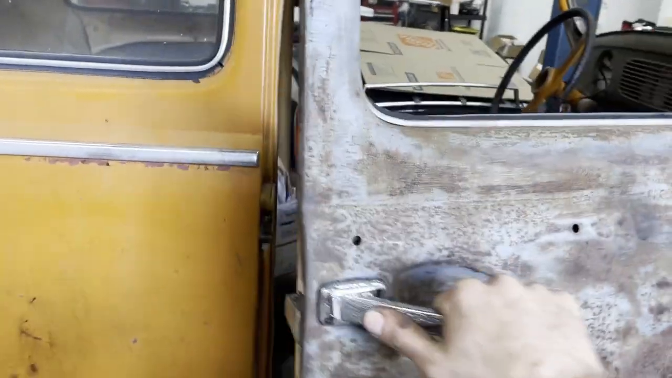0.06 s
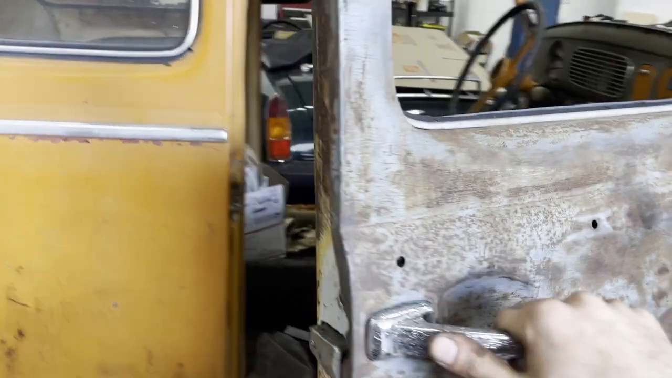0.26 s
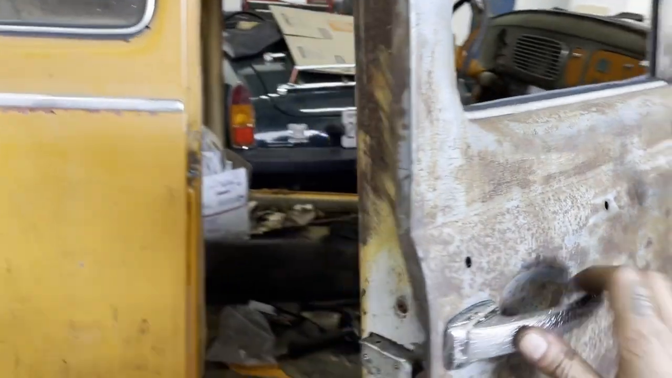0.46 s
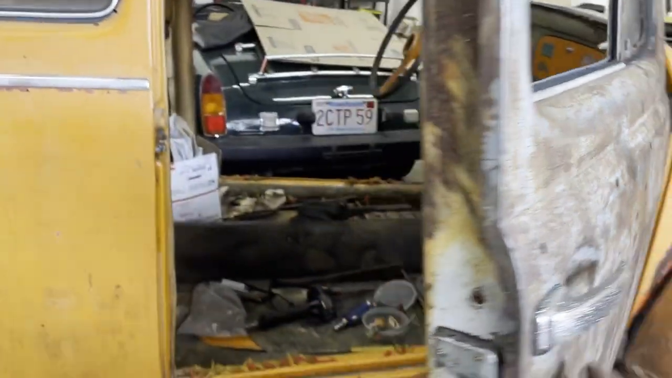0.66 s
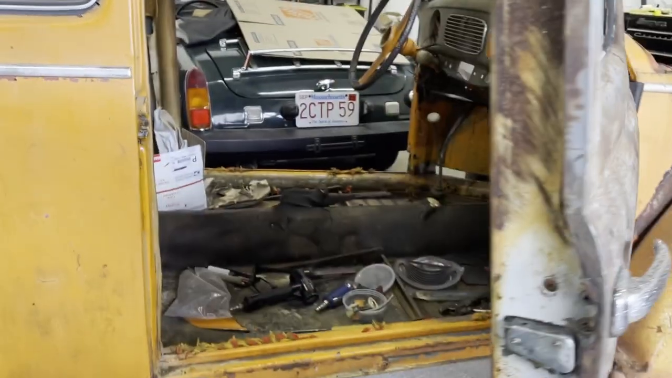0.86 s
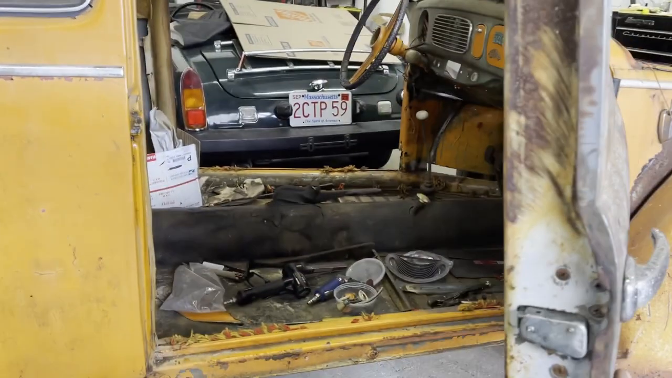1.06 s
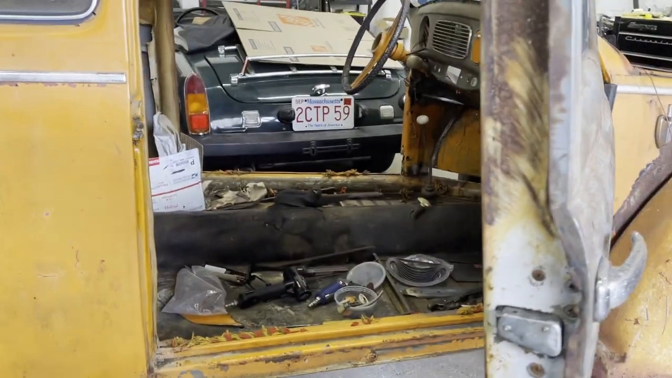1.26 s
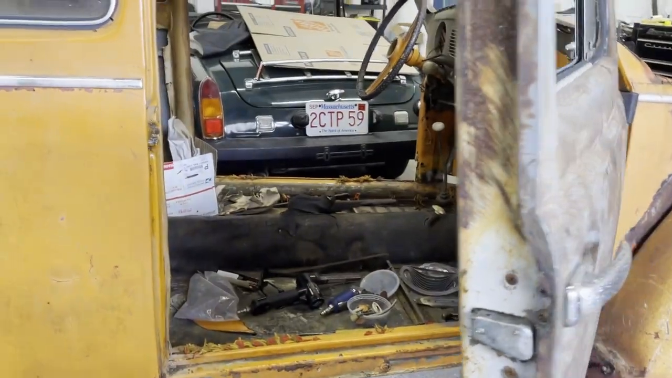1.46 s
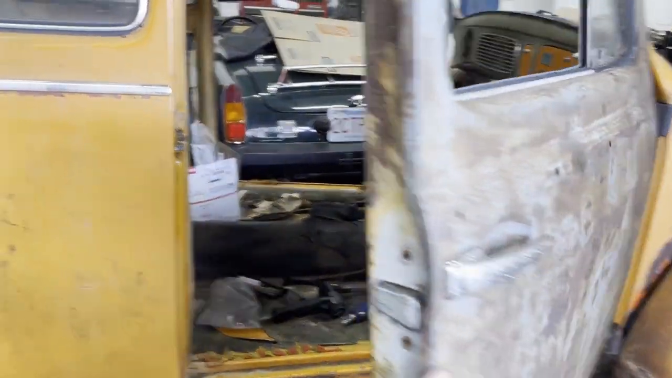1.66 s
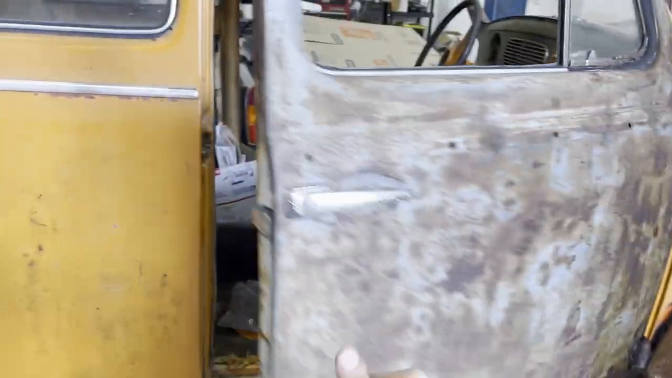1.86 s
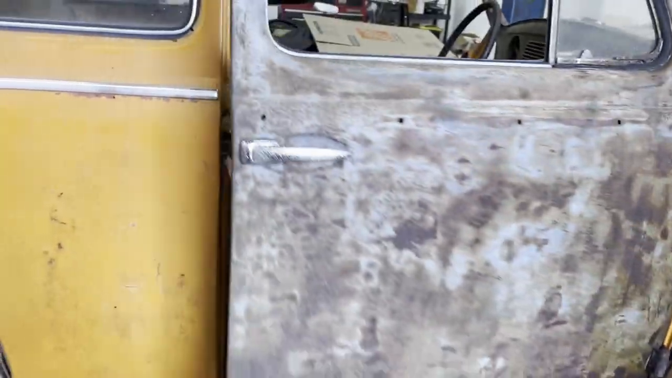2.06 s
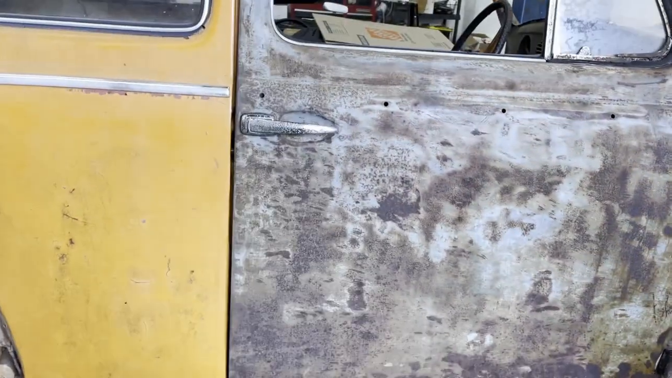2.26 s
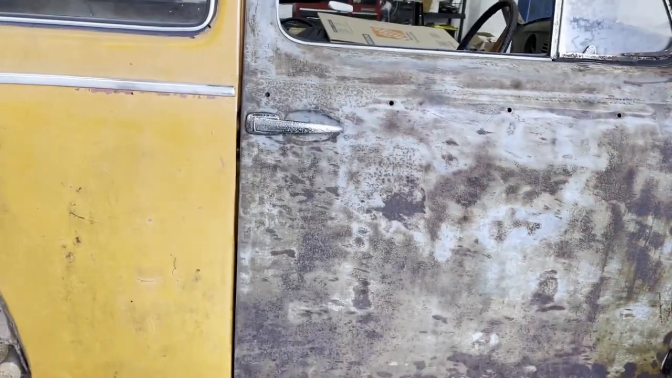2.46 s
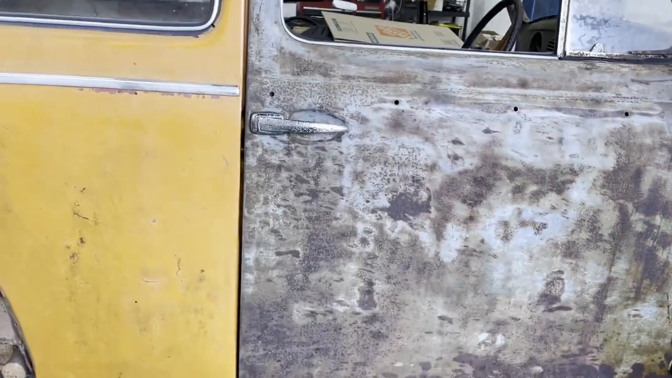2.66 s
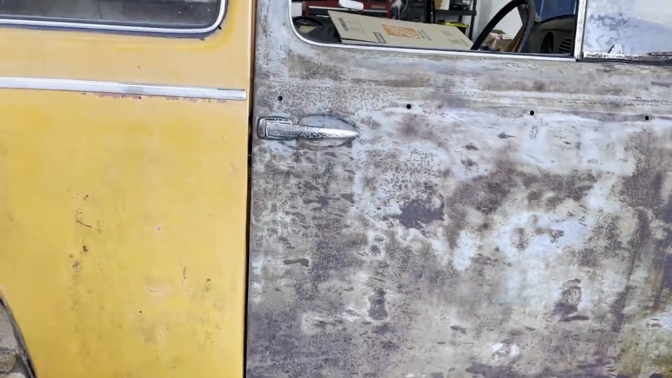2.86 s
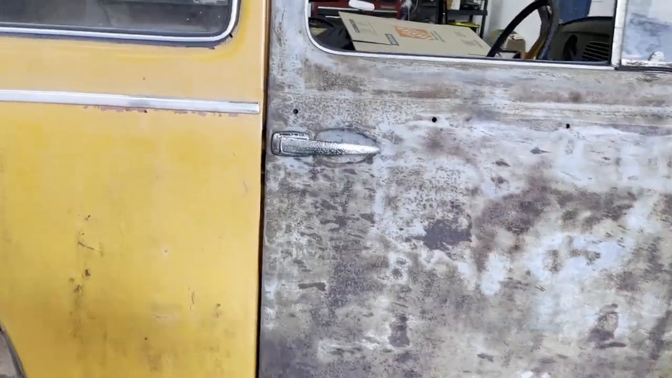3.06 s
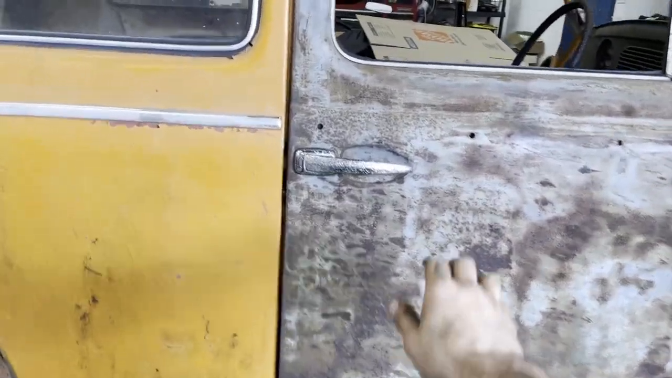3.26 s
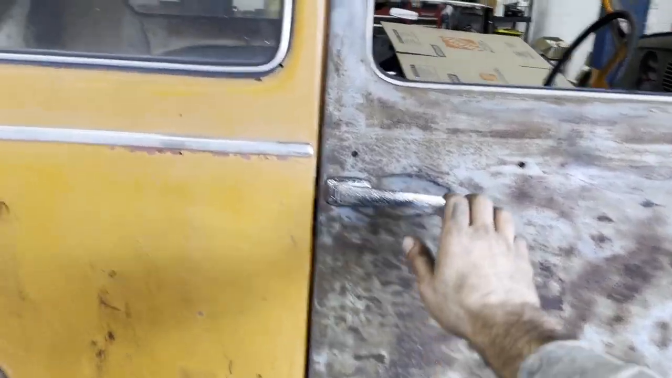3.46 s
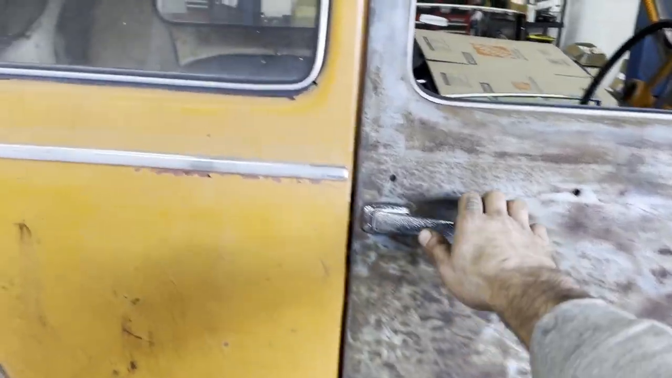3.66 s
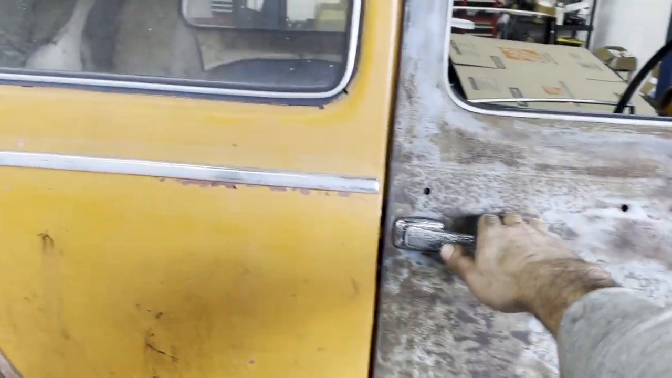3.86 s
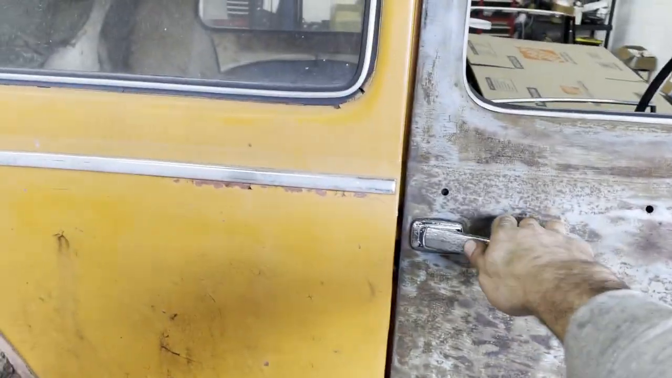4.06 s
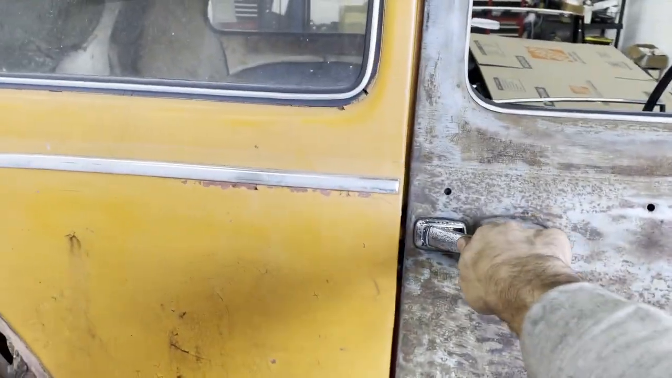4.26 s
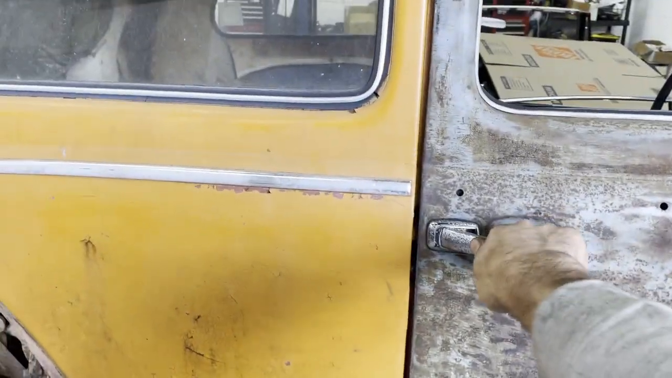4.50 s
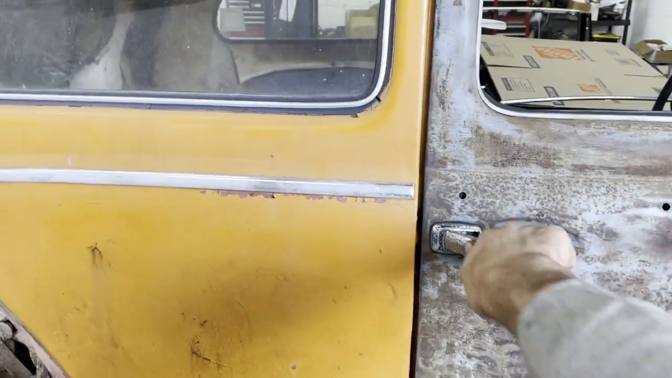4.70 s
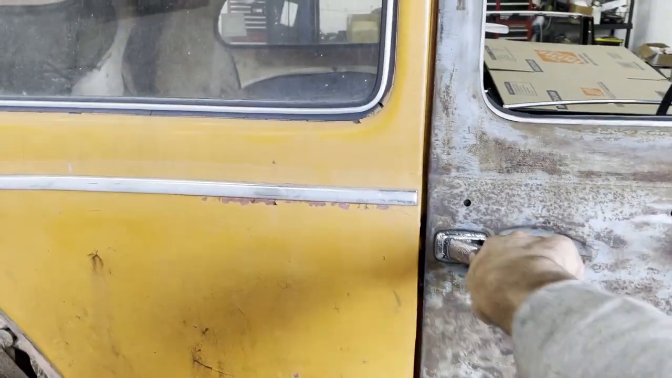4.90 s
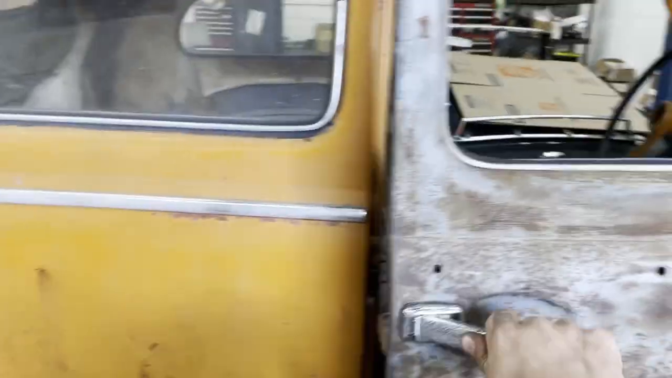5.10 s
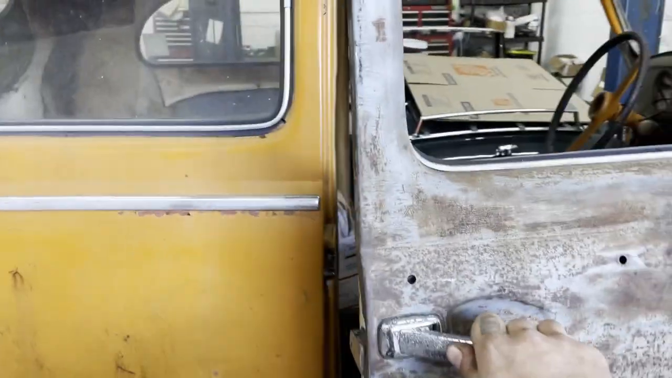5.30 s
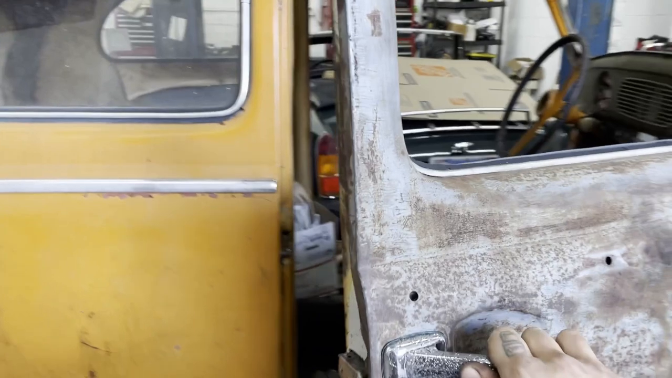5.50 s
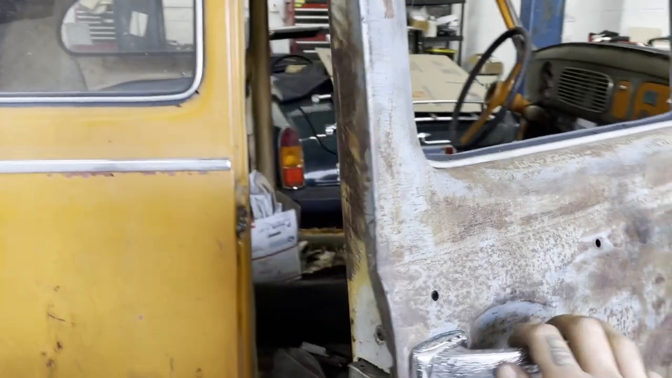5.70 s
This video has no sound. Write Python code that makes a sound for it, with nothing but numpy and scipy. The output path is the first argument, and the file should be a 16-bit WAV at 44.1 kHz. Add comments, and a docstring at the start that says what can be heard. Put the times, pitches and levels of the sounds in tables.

```python
"""In a garage, an old steel car door is heard from arm's length. It swings open on a juddering, dry hinge and is
slammed: latch, frame and panel collide in turn and the loose fittings rattle. A hand then works the push-button
handle, the latch lets go with a clack and the door is tugged free of its frame. Jerks, grains and strikes drive
the resonances of the steel; echoes made of fading noise place them in the room."""
import sys
import numpy as np
from scipy import signal
from scipy.fft import rfft, irfft, next_fast_len
from scipy.io import wavfile
from scipy.ndimage import uniform_filter1d

SR = 44100
rng = np.random.default_rng(int(sys.argv[2]) if len(sys.argv) > 2 else 0)


def unload_audio(sound):
    """Save the sound as a 16-bit wav file, at the path given as the first command line argument."""
    columns = np.transpose(np.atleast_2d(sound))
    # keep every value between -1 and 1, then stretch to whole-number steps
    steps = np.round(np.clip(columns, -1, 1) * 32767)
    wavfile.write(sys.argv[1], SR, steps.astype(np.int16))


N = 253134
T = np.arange(N) / SR  # the time of every sample (s)

# tone of dry grit: f/Hz, level/dB
GRIT_TONE = [(200, -11), (700, 14), (2500, 9), (5000, -1), (7000, -4), (11000, -31), (15000, -28.5)]
# tone of a scuff on the steel: f/Hz, level/dB
SCUFF_TONE = [(300, -18.5), (900, -0.5), (1370, 10), (1650, -11.5), (2000, 1), (2500, -4), (3300, -14.5),
              (6000, -32), (12000, -35)]
# sound from all sides, its left-right difference against its middle: f/Hz, level/dB
SIDE_WIDTH = [(80, -16), (250, -12), (500, -9), (1200, -7), (2000, -1), (6000, -1), (8200, -9), (11000, -7)]


def undb(db):
    """Decibels to gain."""
    return 10 ** (np.asarray(db) / 20)


def unit(x):
    """Scale to rms 1."""
    return x / np.sqrt(np.mean(x ** 2))


def over_hz(points, size):
    """Points joined on a log-frequency axis, read at the bins of a transform."""
    hz, value = np.transpose(points)
    return np.interp(np.log(np.fft.rfftfreq(size, 1 / SR) + 1), np.log(hz), value)


def colour(x, points):
    """Filter to the given (Hz, dB) response without sounding ahead of its input (minimum phase)."""
    size = next_fast_len(x.shape[-1] + 4096, True)
    cepstrum = irfft(np.log(undb(over_hz(points, size))), size)
    # folding the cepstrum onto its first half makes the filter causal
    cepstrum[1:size // 2] *= 2
    cepstrum[size // 2 + 1:] = 0
    return irfft(rfft(x, size) * np.exp(rfft(cepstrum)), size)[..., :x.shape[-1]]


def resonate(x, hz, width_hz):
    """One resonance, gain 1 at its centre."""
    return signal.lfilter(*signal.iirpeak(hz, hz / width_hz, SR), x)


def fade(t, t60):
    """Exponential decay by 60 dB in t60."""
    return np.exp(-np.log(1000) * t / t60)


def ring(modes, t, contact_ms, blur, cycles=0.51):
    """Modes of alternating sign swell during the contact and their first cycles; loose joints blur their pitch."""
    out = 0
    for k, (hz, db, t60) in enumerate(modes):
        drift = blur * np.cumsum(rng.standard_normal(len(t))) * np.sqrt(hz / SR)
        phase = 2 * np.pi * hz * t + drift
        swell = 1 - np.exp(-t / (contact_ms / 1000 + cycles / hz))
        out = out + (-1) ** k * undb(db) * np.sin(phase) * fade(t, t60) * swell
    return out


def add(track, s, sound):
    """Mix a sound in at time s."""
    start = max(int(s * SR), 0)
    track[start:start + len(sound)] += sound[:N - start]


def grains(size, rate, spread_db):
    """Random tiny contacts of unequal force."""
    hits = rng.random(size) < rate / SR
    force = undb(spread_db * rng.standard_normal(size))
    return unit(hits * rng.choice([-1, 1], size) * force)


def slips(rate, uneven, spread_db):
    """Stick-slip: a train of jerks, uneven in gap and size."""
    gap, force = rng.standard_normal((2000, 2)).T
    elapsed = np.cumsum(np.exp(uneven * gap)) - np.exp(uneven * gap[0])
    at = (elapsed * SR / rate).astype(int)
    return np.bincount(at[at < N], undb(spread_db * force)[at < N], N)


def smear(x, t60):
    """Bending waves spread each jerk out in time on their way through the panel."""
    t = T[:SR // 8]
    return signal.fftconvolve(x, rng.standard_normal(len(t)) * fade(t, t60))[:N]


def stroke(start, end, db, swell_db_per_s, attack_s, release_t60):
    """Gain of one movement: it sets in, swells or sags while it lasts, then dies away."""
    held = np.clip(T - start, 0, max(end - start, 0))
    release = fade(np.maximum(T - end, 0), release_t60)
    return undb(db + swell_db_per_s * held) * np.minimum(held / attack_s, 1) * release


def follow(x, moves, attack_s, release_t60, size=3000):
    """Let a sound take the level of a series of movements, dying away after each."""
    power = uniform_filter1d(uniform_filter1d(x ** 2, size), size)
    steady = x / np.sqrt(power + 1e-3 * np.mean(x ** 2))
    return steady * sum(stroke(*move, attack_s, release_t60) for move in moves)


def shower(times, db, hz, octaves, cycles):
    """Many small impacts, each with its own pitch and force, ringing for a few cycles."""
    out, spread_db = np.zeros(N), 2
    chance = rng.standard_normal((len(times), 2)).clip(-2, 2)
    for s, level_db, (pitch, force) in zip(times, db, chance):
        own_hz = min(hz * 2 ** (octaves * pitch), SR / 3)
        turns = own_hz * T[:int(SR * cycles / own_hz)]
        chink = np.sin(2 * np.pi * turns) * fade(turns, cycles) * (1 - np.exp(-turns)) ** 2
        add(out, s, undb(level_db + spread_db * force) * chink)
    return out


def clanks(modes, taps, blur):
    """A steel part rings with the same modes each time it is struck."""
    out = np.zeros(N)
    longest_s = max(t60 for _, _, t60 in modes)
    t = T[:SR * 2 // 3][:int(SR * longest_s)]
    for s, db, contact_ms in taps:
        add(out, s, undb(db) * ring(modes, t, contact_ms, blur))
    return out


def diffuse(size):
    """Noise from all sides: alike at both microphones in the bass, unlike higher up."""
    mid, side = rng.standard_normal((2, size))
    return mid + np.array([[1], [-1]]) * colour(side, SIDE_WIDTH)


def background(db=-56.5):
    """A faint, steady background from all sides, with a low rumble in the deep bass."""
    # tone of the background: f/Hz, level/dB
    background_tone = [(15, -41), (30, -8.5), (65, 0.5), (264, -10), (430, -4.5), (1900, -19), (4500, -28.5),
                       (14000, -43.5)]
    return undb(db) * unit(colour(diffuse(N), background_tone))


def judder(count=900):
    """The stiff hinges move in jerks, no two alike: deep ones shake the whole door, lighter ones scrape."""
    # swings on the hinges: start t/s, end t/s, first level/dB, swell/(dB per s), scrape against that level/dB
    swings = [(0, 0.276, -26.5, -25.5, -8), (0.283, 0.804, -25, -5.5, -11.5),
              (5.595, 5.723, -28.5, 35, -19.5)]
    attack_s, release_t60 = 0.014, 0.14
    start = np.zeros(count)  # all jerks share one middle level (dB)
    rumble = unit(shower(rng.uniform(0, T[-1], count), start, hz=120, octaves=.65, cycles=5.6))
    scrape = unit(shower(rng.uniform(0, T[-1], count), start, hz=449, octaves=.3, cycles=10))
    out = 0
    for *move, scrape_db in swings:
        out = out + follow(rumble + undb(scrape_db) * scrape, [move], attack_s, release_t60)
    return out


def rubbing(rate=2800, spread_db=4):
    """Hinge, check strap and hand rub dryly: short strokes of grit, some stirring a resonance, with some hiss."""
    # strokes: middle t/s, spread t/s (standard deviation), level/dB, then against it: resonance/dB, hiss/dB
    rubs = [(0.028, 0.083, -38, -10.5, -21), (0.434, 0.24, -57, -8.5, -20), (0.519, 0.017, -39, -31, -13),
            (0.557, 0.0049, -34.5, -32, -11.5), (0.582, 0.027, -50, 9.5, -23),
            (0.804, 0.038, -55, -21, -4.5), (1.091, 0.13, -55.5, -7, -7.5), (1.834, 0.025, -42.5, -17, -5),
            (3.104, 0.23, -57.5, -4, -17.5), (5.72, 0.087, -63.5, -12.5, -24)]
    hiss_hz, hiss_width_hz = 10260, 18000
    out, grit = np.zeros(N), unit(colour(grains(N, rate, spread_db), GRIT_TONE))
    ringing = unit(resonate(grit, 1005, width_hz=160))
    hiss = resonate(grains(N, rate, spread_db), hiss_hz, hiss_width_hz)
    hiss = unit(resonate(hiss, hiss_hz, hiss_width_hz))
    for s, spread_s, db, resonance_db, hiss_db in rubs:
        rub = grit + undb(resonance_db) * ringing + undb(hiss_db) * hiss
        out += undb(db) * rub * np.exp(-.5 * ((T - s) / spread_s) ** 2)
    return out


def knocks(t60=0.068, overtone=1.9, overtone_db=-8, overtone_t60=0.022, tick_t60=0.063, tick_rise_s=0.0023):
    """Larger slips and bumps of hinge and panel: a damped hollow note, its brief overtone and a scuffing tick."""
    # knocks: t/s, level/dB, f/Hz, tick against that level/dB
    bumps = [(.293, -10.5, 213, -44), (.311, -11, 95, -45), (0.372, -13, 114, -42), (0.401, -11, 185, -49),
             (0.446, -10, 113, -43), (0.504, -11.5, 200, -37), (.562, -14, 287, -24),
             (0.586, -9.5, 177.5, -36), (0.724, -27, 151, -40), (.752, -28, 650, -27),
             (0.767, -14.5, 135, -40), (0.827, -18.5, 171, -42), (.957, -29, 608, -28.5),
             (1.321, -39, 548, -20), (2.575, -15.5, 323, -22), (3.194, -31, 634, -5.5),
             (3.249, -31.5, 624, -12), (3.314, -24.5, 630, -19), (3.409, -26.5, 491, -16),
             (3.567, -33.5, 553, -16), (3.631, -29, 607, -8.5), (3.661, -27, 540, -9.5),
             (3.879, -34, 543, -26), (4.967, -5.5, 232.5, -20), (5.048, -13.5, 480, -20),
             (5.136, -17.5, 550, -16), (5.203, -22.5, 567, -34), (5.563, -16.5, 100, -47.5),
             (5.601, -34, 561, -25), (5.67, -18, 135, -39), (5.708, -20.5, 114.6, -38)]
    out, t = np.zeros(N), T[:SR // 4]
    for s, db, hz, tick_db in bumps:
        modes = [(hz, 0, t60), (overtone * hz, overtone_db, overtone_t60)]
        note = ring(modes, t, contact_ms=0.8, blur=0.45)
        scuff = unit(colour(rng.standard_normal(len(t)), SCUFF_TONE))
        tick = scuff * fade(t, tick_t60) * (1 - np.exp(-t / tick_rise_s))
        add(out, s, undb(db) * (note + undb(tick_db) * tick))
    return out


def squeaks():
    """Hinge pin and latch sing for instants, mostly falling in pitch; the more it wavers, the rougher they sound."""
    # squeaks: middle t/s, spread t/s (standard deviation), level/dB, start f/Hz, end f/Hz, waver f/Hz (rms)
    songs = [(0.496, 0.0086, -30, 2560, 2460, 45), (0.54, .022, -37, 2360, 2335, 170),
             (0.598, .025, -53, 3610, 3570, 45), (0.68, 0.036, -58, 4660, 4665, 35),
             (1.856, 0.021, -38.5, 1180, 1138, 175), (2.336, 0.0019, -22, 6310, 6185, 115),
             (4.635, 0.0034, -25, 6490, 5520, 250), (5.137, 0.001, -22.5, 4430, 3630, 115)]
    out, wobble = 0, unit(uniform_filter1d(rng.standard_normal(N), size=40))
    for s, spread_s, db, start_hz, end_hz, waver_hz in songs:
        glide = np.interp(T, [s - 2 * spread_s, s + 2 * spread_s], [start_hz, end_hz])
        tone = np.sin(2 * np.pi * np.cumsum(glide + waver_hz * wobble) / SR)
        out = out + undb(db) * tone * np.exp(-.5 * ((T - s) / spread_s) ** 2)
    return out


def blow(db, boom_db, body_db, click_db, contact_ms, rattle_t60):
    """Each blow rings the panel and sets loose steel chattering; where it lands decides boom, body and click."""
    # main modes of the door: f/Hz, level/dB, t60/s
    door_modes = [(73, -6, 0.53), (89.7, -4.5, 0.85), (123, -12, 0.28), (142.6, -4, 0.63),
                  (167.3, 4.5, 0.42), (199.3, -8, 0.28), (271.2, -10.5, 0.34), (298, 3.5, 0.34),
                  (343.5, -12.5, 0.37), (381, -20.5, 0.58), (630, -15, 0.43), (725, -2, 0.1),
                  (857, -12, 0.19), (999, -5.5, 0.16)]
    # the crowd of weaker modes in the sheet steel: f/Hz, level/dB
    steel_tone = [(22, -1), (50, 25), (100, 23.5), (260, 22), (480, 14.5), (800, 11.5), (1450, 11.5),
                  (1750, 6), (2600, 10.5), (4200, 6), (6400, 4.5), (10500, 3), (14500, -6.5)]
    t = T[:SR * 3 // 4]
    chatter = grains(len(t), rate=4000, spread_db=4)
    chatter = chatter * (1 - np.exp(-1000 * t / contact_ms)) * fade(t, rattle_t60)
    panel = colour(chatter, steel_tone) + undb(-1) * ring(door_modes, t, contact_ms, blur=0.54)
    # boom, body, clang and click (Hz, dB)
    balance = [(84, boom_db), (224.1, body_db), (1296, 0), (10300, click_db)]
    return undb(db) * colour(panel, balance)


def door():
    """Hard, thin strikes of the latch and softer, heavy thuds against the frame."""
    # latch steel strikes steel: t/s, level/dB, click against it/dB, contact time/ms, rattle t60/s
    strikes = [(2.2, -43.5, -19.5, 2.6, 1), (2.278, -14.5, -2, 2.3, 0.076),
               (2.2921, -15.5, 13.5, 0.54, 0.017), (4.109, -41, -15, 1, 0.11),
               (4.615, -28, -22.5, 0.21, 0.028), (4.714, -33.5, 5, 1.5, 0.067), (4.945, -33, 3, 7, 0.18),
               (4.955, -21, -8.5, 2.7, 0.15), (5.135, -25.5, -13.5, 0.28, 0.081)]
    # the door's weight meets its frame or rebounds: t/s, level/dB, then against it: boom/dB, body/dB, click/dB;
    # rattle t60/s
    thuds = [(2.297, -18.5, 5.5, -5, -4, 0.46), (2.322, -25.5, 15, 7.5, -7, 0.18),
             (2.349, -24.5, 3, 4, -9, 0.34), (2.405, -31, 2.5, 9.5, -15, 0.8),
             (4.064, -53, 1, 9.5, -41.5, 1), (4.153, -43.5, 4, 4.5, -38.5, 0.71),
             (4.626, -23, -7, 7, -15, 0.2), (4.963, -19, 12, 0, -26, 0.23),
             (5.008, -33, 12, 8.5, -20, 0.36), (5.142, -46, -16.5, -5.5, -30, 0.2)]
    out = np.zeros(N)
    for s, db, click_db, contact_ms, t60 in strikes:
        add(out, s, blow(db, -8, -7.5, click_db, contact_ms, t60))
    for s, db, boom_db, body_db, click_db, t60 in thuds:
        add(out, s, blow(db, boom_db, body_db, click_db, 1.4, t60))
    return out


def pawl():
    """The latch pawl, a small steel catch, gives short dull clanks when struck."""
    # modes: f/Hz, level/dB, t60/s
    modes = [(1150, -2, 0.012), (1244, -7.5, .03), (1391, 4.5, 0.028), (1556, 0.5, .025),
             (1808, -14, 0.017), (2307, -20.5, 0.09)]
    # strikes: t/s, level/dB, contact time/ms
    taps = [(2.204, -32.5, 1.9), (4.616, -16.5, 1.5), (4.624, -8.5, 0.42), (4.635, -10.5, 0.96),
            (4.715, -23, .89), (4.9573, -17, 0.65), (4.9634, -18, 0.8), (4.967, -24.5, 0.88)]
    return clanks(modes, taps, blur=0.46)


def rattles(count=90):
    """Latch parts and loose rods clatter after a hard blow: a dense crunch when brief, single chinks when long."""
    # clatters: start t/s, first level/dB, middle f/Hz, length t/s
    clatters = [(2.29, -15, 894, .06), (2.344, -19, 1800, 0.068), (2.511, -25, 1156, .42),
                (4.619, -22.5, 1182, 0.064), (5.005, -26.5, 679, .3)]
    fall_db = 15.5  # over the length of each clatter
    out = 0
    for s, db, hz, length in clatters:
        progress = (np.arange(count) + rng.random(count)) / count
        levels = db - fall_db * progress
        out = out + shower(s + length * progress, levels, hz, octaves=.65, cycles=16)
    return out


def striker():
    """The striker plate on the door post rings briefly when struck."""
    # modes: f/Hz, level/dB, t60/s
    modes = [(565, -9, 0.023), (747, 4.5, 0.035), (835, -7, 0.055), (893, -2.5, .07), (1031, -11.5, .05),
             (1192, -9.5, .06)]
    # strikes: t/s, level/dB, contact time/ms
    taps = [(2.2925, -6, 0.4), (2.307, -19.5, .6), (5.011, -17, .8), (5.138, -19.5, .8)]
    return clanks(modes, taps, blur=0.4)


def window_frame():
    """The thin window frame rings on after hard blows."""
    # modes: f/Hz, level/dB, t60/s
    modes = [(1236, 2, 0.27), (1405, 0.5, 0.24), (1955, -8.5, .6), (2063, -10, 0.39), (2410, -8.5, 0.84),
             (2630, -10.5, 0.4), (3520, -14.5, 0.46)]
    # jolts: t/s, level/dB, contact time/ms
    taps = [(2.296, -27.5, .8), (2.354, -32, 2)]
    return clanks(modes, taps, blur=0.084)


def creak(drone_db=6.0, scuff_db=-15, count=4):
    """Quick, uneven slips scuff the steel and sound a hollow resonance, over a low drone slower to build and fade."""
    # creaks as the hand comes and as the door comes free: start t/s, end t/s, first level/dB, swell/(dB per s)
    moves = [(3.11, 3.662, -40.5, -8.5), (3.833, 3.915, -51.5, -5), (5.101, 5.193, -39, -21)]
    jerks = sum(smear(slips(rate=40, uneven=0.87, spread_db=2.5), t60=0.072) for _ in range(count))
    hollow = resonate(resonate(jerks, 540, width_hz=235), 540, width_hz=235)
    drone = resonate(resonate(jerks, 91.8, width_hz=65), 91.8, width_hz=65)
    rasp = unit(hollow) + undb(scuff_db) * unit(colour(jerks, SCUFF_TONE))
    rasp = follow(rasp, moves, attack_s=0.092, release_t60=0.45)
    return rasp + undb(drone_db) * follow(drone, moves, attack_s=0.15, release_t60=0.75)


def handle(tick_db=-11, tick_t60=0.012):
    """Button and return spring of the handle ping as the thumb takes up their slack."""
    # modes of button and spring: f/Hz, level/dB, t60/s
    button_modes = [(3720, -6.5, 0.47), (3820, 11.5, 0.052), (6900, -10, 0.036), (7500, 3, 0.054)]
    spring_modes = [(2530, 3.5, 0.084), (2620, -7, 0.48), (2800, -3.5, 0.39), (3000, -3, 0.14),
                    (5170, -13, 0.29), (5350, -1.5, 0.07), (5700, -13.5, 0.22)]
    # strikes on button and spring: t/s, level/dB, contact time/ms
    button_taps = [(4.122, -46.5, 8.1), (4.145, -35.5, 1.4)]
    spring_taps = [(4.227, -35.5, 0.92)]
    out, t = np.zeros(N), T[:SR // 2]
    for modes, taps in (button_modes, button_taps), (spring_modes, spring_taps):
        for s, db, contact_ms in taps:
            tick = colour(rng.standard_normal(len(t)), GRIT_TONE) * fade(t, tick_t60)
            ping = ring(modes, t, contact_ms, blur=0.21)
            add(out, s, undb(db) * (ping + undb(tick_db) * tick))
    return out


def free_panel(s=4.966, db=-26, hz=73.0, t60=1.7):
    """Once clear of its frame, the door's lowest mode rings on, fading slowly as nothing damps it."""
    t = np.maximum(T - s, 0)
    return undb(db) * np.sin(2 * np.pi * hz * t) * fade(t, t60)


def nearby(x, db=-3, t60=0.08):
    """First reflections off the car body reach the two microphones differently."""
    t = T[:SR // 8]
    taps = rng.standard_normal(len(t)) * fade(t, t60)
    side = colour(signal.fftconvolve(x, taps / np.linalg.norm(taps))[:N], SIDE_WIDTH)
    return undb(db) * np.array([side, -side])


def even_out(tail, size=14):
    """Smooth the uneven spectrum of the noise tail, so that the echoes ring evenly at all pitches."""
    power = np.mean(abs(rfft(tail)) ** 2, axis=0)
    ripple_db = 10 * np.log10(uniform_filter1d(power, size) / uniform_filter1d(power, 10 * size))
    hz = np.fft.rfftfreq(tail.shape[-1], 1 / SR) + 1
    return colour(tail, np.column_stack([hz, -ripple_db]))


def garage(x, build_s=0.002):
    """Dense echoes of a cluttered garage: noise in bands that fade at their own pace, the bass lasting longest."""
    # reverberation: f/Hz, t60/s, level/dB
    bands = [(60.5, 1.6, -6.5), (149, 1.6, -11), (386, 1.24, -1), (1020, 0.78, -5.5), (2570, 0.86, -6),
             (5500, 0.77, -6.5), (10000, 0.19, -4.5), (15000, .45, -9.5)]
    t = T[:2 * SR]
    noise, tail = rfft(diffuse(len(t))), 0
    for k, (_, t60, db) in enumerate(bands):
        # each band is full at its own frequency and gone at its neighbours'
        band = over_hz([(row[0], j == k) for j, row in enumerate(bands)], len(t))
        decay = fade(t, t60) * (1 - np.exp(-t / build_s))
        tail = tail + undb(db) * irfft(noise * band) * decay / np.linalg.norm(decay)
    return signal.fftconvolve(x[None], even_out(tail), axes=1)[:, :N]


def scene(handle_room_db=-8.0, judder_room_db=-5.0):
    """All sounds of the door, their echoes and a faint rumbling background; the closest parts sound driest."""
    rumble = judder() + knocks()
    steel = rubbing() + door() + rattles() + window_frame() + creak()
    latch = squeaks() + pawl() + striker() + handle()
    direct = steel + latch + rumble
    echoes = garage(steel + undb(handle_room_db) * latch + undb(judder_room_db) * rumble)
    return direct + free_panel() + nearby(direct) + echoes + background()


def record(dry, ceiling=.98, top_hz=15500):
    """Two small microphone ports colour and delay the treble; the loudest peaks are rounded and the top is cut."""
    # left ahead of right: f/Hz, phase/rad
    lead = [(100, 0), (2200, 0), (3100, .7), (5000, .3), (6300, -.5), (8000, -3.1), (9100, -4),
            (10700, -5.9), (13000, -6.8), (13900, -9.1), (15200, -9.5)]
    # left louder than right: f/Hz, level/dB
    lean = [(80, 1.1), (300, -.1), (1000, .4), (2400, 4), (4500, 2.5), (8000, 0)]
    # response of both microphones: f/Hz, level/dB
    response = [(30, -15), (52, 1.5), (6900, -2), (8200, -7.5), (9100, -4.5), (10000, -5.5), (13000, -9),
                (15000, -6.5)]
    size = next_fast_len(N + SR // 10, True)
    # half of each difference goes to either side
    between = undb(over_hz(lean, size) / 2) * np.exp(.5j * over_hz(lead, size))
    heard = np.pad(colour(dry, response), [(0, 0), (0, size - N)], "linear_ramp")
    ports = irfft(rfft(heard) * np.array([between, 1 / between]), size)[:, :N]
    rounded = ceiling * np.tanh(ports / ceiling)
    return signal.sosfilt(signal.ellip(8, .2, 80, top_hz, fs=SR, output="sos"), rounded)


dry = scene()
out = record(dry)
unload_audio(out)
```